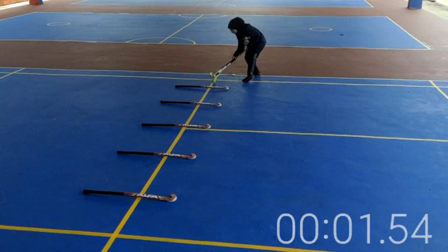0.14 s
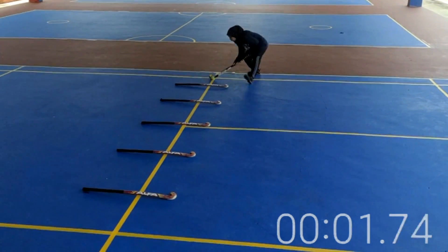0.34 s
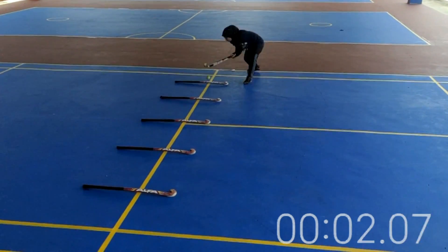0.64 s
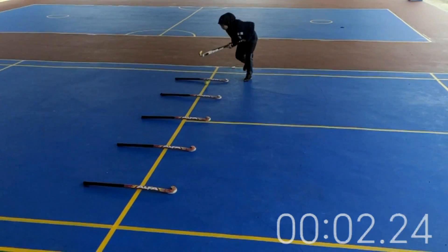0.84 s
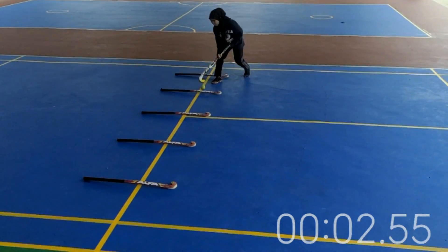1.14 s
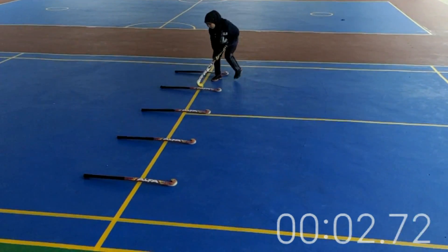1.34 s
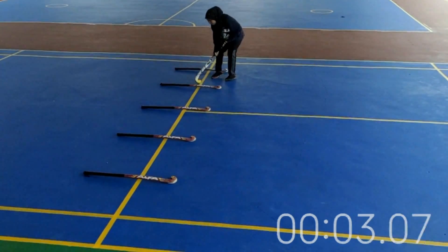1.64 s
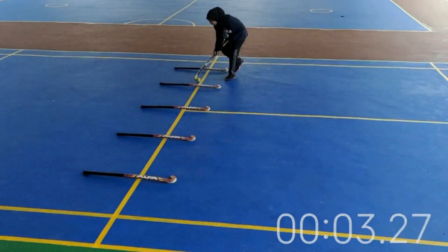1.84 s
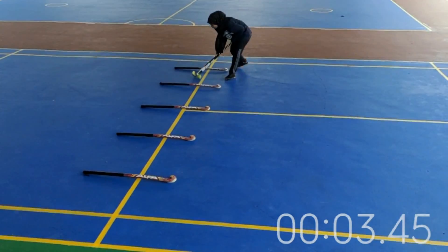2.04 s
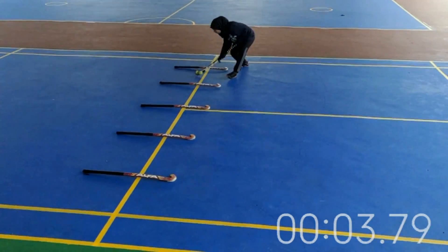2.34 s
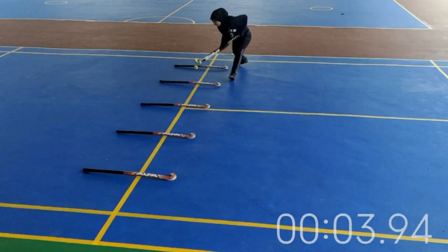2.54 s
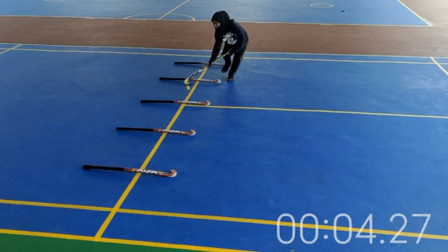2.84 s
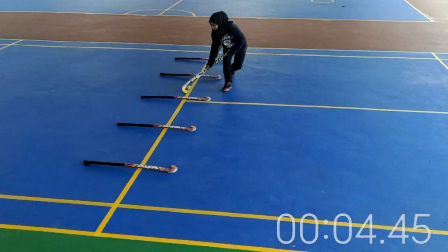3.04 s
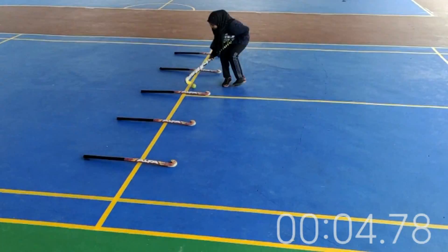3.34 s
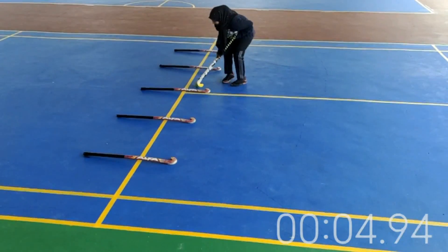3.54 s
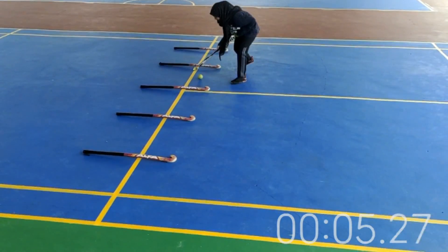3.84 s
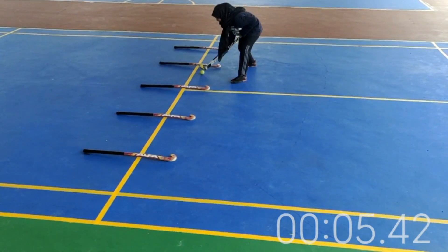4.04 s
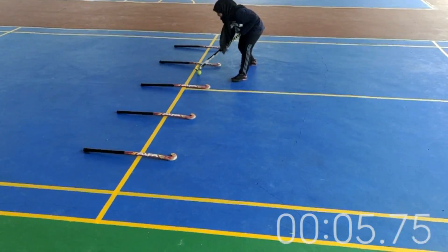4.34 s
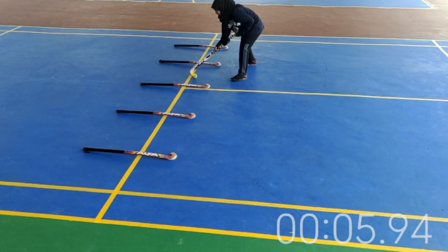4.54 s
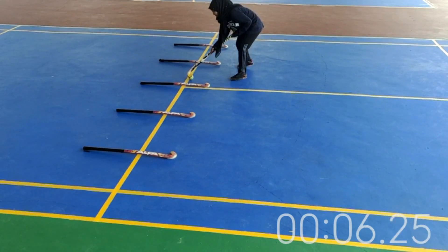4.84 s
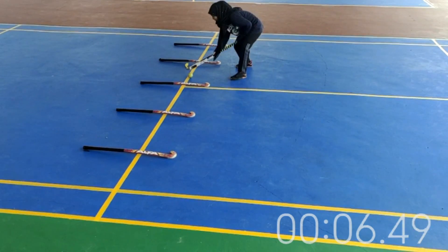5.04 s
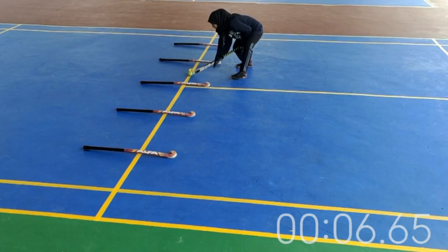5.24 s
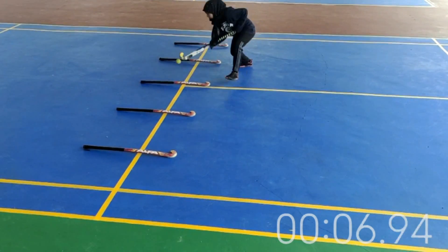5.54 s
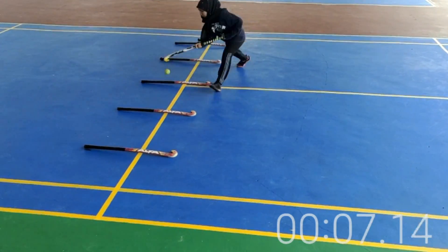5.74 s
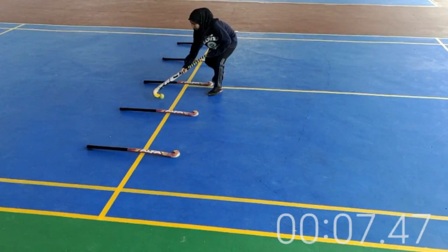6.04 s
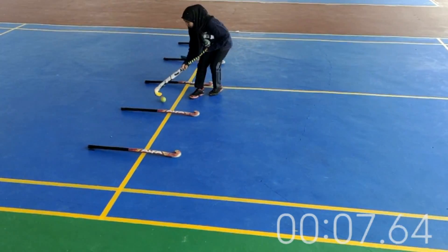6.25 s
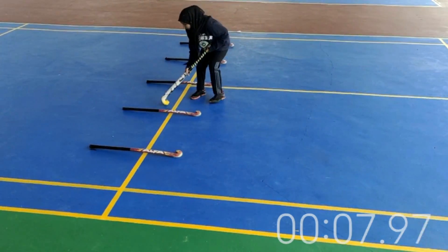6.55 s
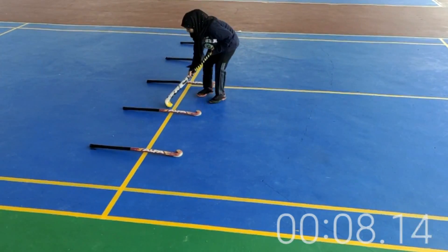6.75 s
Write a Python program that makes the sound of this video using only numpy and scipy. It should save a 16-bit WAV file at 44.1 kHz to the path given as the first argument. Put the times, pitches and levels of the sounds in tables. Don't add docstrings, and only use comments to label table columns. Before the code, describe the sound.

A hockey stick knocks a hard ball in uneven woody cracks along a roofed sports court, with ball thuds, faint sole squeaks and long echoes.

```python
import sys
import numpy as np
from scipy import signal
from scipy.fft import rfft, irfft
from scipy.io import wavfile
from scipy.ndimage import uniform_filter1d

SR = 44100
rng = np.random.default_rng(int(sys.argv[2]) if len(sys.argv) > 2 else 0)


def to_linear_factor(level_db):
    exponent = np.asarray(level_db, float) / 20
    return 10 ** exponent


def transcribe(u):
    v = np.clip(np.atleast_2d(u).T, -1, 1)
    q = np.round(v * 32767).astype(np.int16)
    wavfile.write(sys.argv[1], SR, q)


N = 303849
LEAD = SR // 2

ECHO_S = [.003, .0222, .0245, .0345, .08, .125]


def evened(x):
    return x / np.sqrt(np.mean(x ** 2) + 1e-20)


def read(points, hz):
    f, value = np.transpose(points)
    return np.interp(np.log(hz + 1), np.log(f + 1), value)


def add(mix, start_s, sound):
    part = mix[:, LEAD + round(start_s * SR):][:, :sound.shape[1]]
    part += sound[:, :part.shape[1]]


def coloured(x, points):
    size = x.shape[-1]
    return irfft(rfft(x) * to_linear_factor(read(points, np.fft.rfftfreq(size, 1 / SR))), size)


def paired(z, hz):
    # hz, likeness (0-1)
    likeness = [(60, 0.96), (300, 0.81), (640, 0.66), (1400, .02), (5000, 0.0071)]
    same = np.clip(read(likeness, hz), -1, 1)[:, None]
    right = same * z[0] + np.sqrt(1 - same ** 2) * z[1]
    return np.array([z[0], right])


def swing(t, hz):
    late = np.maximum(t - np.array([[0], [.0001]]), 0)
    envelope = np.exp(-(late * hz / 0.79) ** 2) * (1 - np.exp(-late * hz / 0.14))
    return -np.sin(2 * np.pi * hz * late) * envelope


def crack(t, decay_s, hz):
    # hz, level_db
    splinter = [(2000, -31), (3600, -8.5), (5500, -13.5), (7200, -7.5), (8600, -14), (10000, -28),
                (13000, -26), (16000, -51)]
    tilted = [(f, db - 4.3 * abs(np.log2(f / hz))) for f, db in splinter]
    noise = evened(coloured(rng.standard_normal((2, len(t))), tilted))
    return noise * np.exp(-t / decay_s) * (1 - np.exp(-t / 0.000046))


def shaft(t, hz, clean_db, chance):
    shaft_hz = [980, 1460, 1925, 2470, 3060, 3590, 4180, 4850]
    middle_db, uneven_db, t60_s = -9.5, 7.5, 0.066
    line_hz = np.array(shaft_hz)[:, None]
    line_db = -5.5 * np.log2(line_hz / hz) ** 2 + uneven_db * (chance[:len(line_hz)] - .5)
    decay = to_linear_factor(line_db - 60 * t / t60_s)
    ring = np.array([(decay * np.sin(2 * np.pi * line_hz * np.maximum(t - lag_s, 0))).sum(0)
                     for lag_s in (0, .0001)])
    ring = ring * (1 - np.exp(-t / 0.00012))
    return -to_linear_factor(middle_db + clean_db) * ring / abs(ring).max()


def knock(db, centre, crack_db, loose_db, clean_db):
    # pitch_hz, level_db
    modes = [(620, -14.5), (880, 7), (1100, -48.5), (1270, -8.5), (1395, 8.5), (1600, 4.5), (1780, 8.5),
             (1950, 1), (2150, -0.5), (2480, 7.5), (2750, -8.5), (3100, 12.5), (3650, 10.5), (4300, -9)]
    t, hz = np.arange(2048) / SR, 1526 * centre
    t60_s = 0.02722 * to_linear_factor(0.604 * loose_db)
    spread_oct = 0.83 - .015 * loose_db
    push_db = 0.25 * loose_db + 3.0
    mode_hz, mode_db = np.transpose(modes)[:, :, None]
    chance = rng.random((len(modes), 4))
    mode_hz = mode_hz * (1 + 0.0073 * (chance[:, :1] - .5))
    near_db = mode_db - 10 * (np.log2(mode_hz / hz) / spread_oct) ** 2 + 4 * (chance[:, 1:2] - .5)
    start = np.maximum(t - .0005 - .08 * t60_s * chance[:, 2:3], 0)
    decay = to_linear_factor(near_db - 60 * start / (t60_s + 0.00045)) * (1 - np.exp(-start / 0.00068))
    ring = np.array([(decay * np.sin(2 * np.pi * mode_hz * (start - lag_s))).sum(0)
                     for lag_s in (0, .00012)])
    bending = to_linear_factor(-max(clean_db, 0)) * ring / abs(ring).max()
    blade = to_linear_factor(crack_db) * crack(t, 0.0025, 5140) * (1 - np.exp(-t / 0.00035))
    push = 1.505 * to_linear_factor(push_db) * swing(t, 1.215 * hz)
    return to_linear_factor(db) * (push + 1.085 * bending + 1.64 * blade + shaft(t, hz, clean_db, chance[:, 3:]))


def all_round(sound, colour_db, send_db, crack_db):
    upward_hz = [700, 1700, 3400, 6800, 11000]
    power = uniform_filter1d((abs(rfft(sound, 8192)) ** 2).mean(0), size=22)
    bass_db = -0.69 * send_db
    treble_db = .25 * (-13.5 - crack_db)
    up_db = np.add(colour_db, [bass_db, 0, 0, treble_db, treble_db])
    tilt_db = send_db + read(np.c_[upward_hz, up_db], np.fft.rfftfreq(8192, 1 / SR))
    fold = irfft(np.log(power * to_linear_factor(2 * tilt_db) + 1e-12) / 2)
    fold[1:4096] *= 2
    fold[4097:] = 0
    return irfft(np.exp(rfft(fold)))[None, :2048]


def court():
    # pitch_hz, width_hz, lift_db
    tail_lines = [(985, 45, 7), (1470, 50, 5.5), (1920, 55, 5.5), (2490, 65, 3), (3060, 55, 8), (3580, 80, 7),
                  (4170, 90, 6), (4850, 70, 4)]
    # hz, t60_s
    tail_t60 = [(250, 2.17), (700, 2.14), (1700, 1.52), (4500, 1.58), (8000, 1.023), (13000, 0.47)]
    # level_db, spread_t60_s
    echoes = [(-9, 0.038), (-10.5, 0.0061), (-8, 0.031), (-8, 0.054), (-28, .03), (-22.5, .03)]
    tail_db, tail_rise_s, tail_line_share = -14.5, 0.043, 0.33
    size = 2 * SR
    t = np.arange(size) / SR
    hz, frame_s, z = signal.stft(rng.standard_normal((2, size)), SR, nperseg=256)
    z = paired(z, hz) * to_linear_factor(-60 * frame_s / read(tail_t60, hz)[:, None])
    tail = signal.istft(z, SR, nperseg=256)[1][:, :size]
    for tail_line_hz, width_hz, lift_db in tail_lines:
        line = signal.lfilter(*signal.iirpeak(tail_line_hz, tail_line_hz / width_hz, SR), tail)
        tail = tail + (to_linear_factor(tail_line_share * lift_db) - 1) * line
    since = np.maximum(t - ECHO_S[1], 0)
    power = to_linear_factor(2 * tail_db) * (1 - np.exp(-since / tail_rise_s))
    for delay_s, (db, spread_s) in zip(ECHO_S, echoes):
        power = power + (t > delay_s) * to_linear_factor(2 * (db - 60 * np.maximum(t - delay_s, 0) / spread_s))
    return .12 * tail * np.sqrt(power)


def hum():
    # hz, level_db (per Hz)
    spectrum = [(25, -27), (60, -33.5), (100, 7), (200, 2.5), (400, -5), (700, -7), (1100, -8.5),
                (1600, -11), (2400, -6.5), (2700, -29), (5000, -24.5), (9000, -25.5), (15000, -57)]
    hum_db, mains_hz, mains_db = -64.5, 104.3, -75
    frames, hz = N // 256 + 5, np.fft.rfftfreq(1024, 1 / SR)
    a, b, c, d, patches = rng.standard_normal((frames, 513, 5)).T
    patches = evened(uniform_filter1d(uniform_filter1d(patches, 8, 0), 20, 1))
    drift_db = 2.0 * patches * np.clip(hz / 1200, .3, 1)[:, None]
    z = paired([a + 1j * b, c + 1j * d], hz) * to_linear_factor(read(spectrum, hz)[:, None] + drift_db)
    air = evened(signal.istft(z, nperseg=1024, noverlap=768)[1][:, :N])
    waver = evened(uniform_filter1d(rng.standard_normal(N), 4000))
    mains = to_linear_factor(mains_db + 2.0 * waver) * np.sin(2 * np.pi * mains_hz * np.arange(N) / SR)
    return to_linear_factor(hum_db) * air + mains


def bounce(db, hz, tick_db):
    t, tick_hz = np.arange(2048) / SR, 6400
    hollow = 0.12 * np.sin(2 * np.pi * 2.0 * hz * t) * to_linear_factor(-60 * t / 0.012)
    tick = crack(t, 0.00084, tick_hz) + 0.04 * crack(t, 0.00064, tick_hz)
    return to_linear_factor(db) * (0.9 * (swing(t, hz) + hollow) + 1.18 * to_linear_factor(tick_db) * tick)


def scuff(length_s, db, hz):
    size = round(length_s * SR)
    width_hz = hz * (.035 if hz < 4000 else 0.5)
    offset_hz = np.fft.rfftfreq(size, 1 / SR) - hz
    rasp = irfft(rfft(rng.standard_normal((2, size))) * np.exp(-(offset_hz / width_hz) ** 2), size)
    return to_linear_factor(db) * evened(rasp) * np.hanning(size)


def scene():
    # start_s, blow_db, ring_centre (factor), crack_db (relative), loose_grip_db
    earlier = [
        (-0.23, -22.5, 0.96, -11.5, -1.77),
    ]
    edge = [
        (0.277, -26.5, 1.125, -10.5, 1.5),
        (1.954, -52.5, 0.56, -8.5, -0.5),
        (2.146, -40, 0.84, -21, -1),
        (2.82, -30, 0.92, -8.5, 1.5),
        (2.918, -16.5, 1.3, -18, -2.5),
        (5.85, -25.5, 0.92, -8, -2.5),
        (6.816, -55, 1.7, -18, -7),
    ]
    flush = [
        (1.143, -25.5, 0.94, -10.5, -1.5),
        (1.715, -34, 0.95, -9, -3.5),
        (1.985, -37, 0.75, -32.5, -2),
        (3.523, -28, 0.88, -30.5, -3.5),
        (4.034, -26.5, 1.21, -24, -3.5),
        (4.598, -47, 0.77, -26.5, -4),
        (5.158, -27, 1.186, -12.5, 5.5),
        (6.671, -32.5, 0.77, -17, -2.5),
    ]
    # start_s, peak_db, thud_hz, tick_db (relative), roof_send_db
    bounces = [(0.224, -34, 830, -11.5, -5), (0.692, -32.5, 760, -10.5, 2), (0.829, -36.5, 840, -9, -4),
               (1.043, -42, 557, -40, 5), (1.087, -43, 986, -40, 12), (2.742, -24, 890, -10, 2),
               (2.9, -34, 1300, -1.5, -3), (4.101, -19, 1065, -2.5, -6.5), (5.655, -38.5, 474, -19, 0),
               (5.813, -19.5, 1039, -10.5, -2.5), (5.94, -29.5, 637, -19, -10)]
    # start_s, length_s, level_db, centre_hz, roof_send_db
    scuffs = [(2.471, 0.05, -58, 8670, -5.5), (2.481, 0.13, -71, 2835, -4.5),
              (3.326, 0.0077, -52, 7900, 5.5), (4.794, 0.039, -71.5, 7630, -0.5),
              (4.836, 0.07, -72.5, 7250, 0.5), (4.741, 0.079, -67, 2015, -1),
              (4.816, 0.069, -65, 2354, 4.3), (4.889, 0.072, -66, 2120, -5), (5.035, 0.1, -66.5, 1710, -9),
              (5.768, 0.23, -64.5, 9400, 9), (6.452, 0.033, -68, 8600, -7)]
    stick_up = [0, 1, 2.5, 4.5, 11.5]
    ball_up = [-2, -1, 1.3, -5, 7.5]
    # delay_s, level_db
    mirrors = [(0.025, -10), (0.0376, -9.5)]
    edge_clean_db, flush_clean_db = -13.5, 6.5
    knock_lag_s, bounce_lag_s = .0007, .0017
    mirror_hz, near_held = 1910, .95
    approach, midway_s = .0009, 3.6

    sounds = []
    blows = [(*row, edge_clean_db) for row in earlier + edge] + [(*row, flush_clean_db) for row in flush]
    for s, db, centre, crack_db, loose_db, clean_db in sorted(blows):
        sound = knock(db, centre, crack_db, loose_db, clean_db)
        sent = all_round(sound, stick_up, loose_db, crack_db)
        sounds.append((s + knock_lag_s, sound, sent, loose_db))
    for s, db, hz, tick_db, send_db in bounces:
        sound = bounce(db, hz, tick_db)
        sounds.append((s + bounce_lag_s, sound, all_round(sound, ball_up, send_db, tick_db), 0))
    for s, *row, send_db in scuffs:
        sound = scuff(*row)
        sounds.append((s, sound, to_linear_factor(send_db) * sound[1:], 0))

    direct, wet = np.zeros((2, LEAD + N)), np.zeros((2, LEAD + N))
    places = [court() for _ in range(4)]
    mirror = signal.butter(2, mirror_hz, fs=SR, output="sos")
    near = np.arange(2 * SR) < ECHO_S[1] * SR
    for k, (s, sound, sent, loose_db) in enumerate(sounds):
        add(direct, s, sound)
        later_s, place = s + approach * (s - midway_s), places[k % len(places)]
        for delay_s, db in mirrors:
            add(wet, later_s + delay_s, to_linear_factor(db) * signal.sosfilt(mirror, sound))
        add(wet, s, to_linear_factor(-near_held * loose_db) * signal.fftconvolve(sent, place[:, near], axes=1))
        add(wet, later_s, signal.fftconvolve(sent, place * ~near, axes=1))

    direct = signal.sosfilt(signal.butter(2, 10700, fs=SR, output="sos"), direct)
    radiated = signal.sosfilt(signal.butter(2, 380, "high", fs=SR, output="sos"), direct + wet)
    return radiated[:, LEAD:] + hum()


def roll_off(x):
    return signal.sosfilt(signal.butter(12, 16180, fs=SR, output="sos"), x)


def record(dry):
    # hz, level_db (per bin)
    gate = [(300, -110), (600, -84), (1100, -81), (2400, -99.5), (3000, -84), (8000, -97), (16000, -104)]
    # hz, difference_db
    ports = [(400, 0.2), (750, 0.4), (1300, -6), (2400, 0.5), (4400, 2.5), (7500, 3), (12000, 0)]
    hz, _, z = signal.stft(dry, SR, nperseg=1024, noverlap=768)
    power = uniform_filter1d((abs(z) ** 2).mean(0), size=5, axis=1, origin=2)
    power = uniform_filter1d(power, size=3, axis=0)
    floor_power = to_linear_factor(2 * read(gate, hz))[:, None]
    kept = 0.2 + 0.96 * power / (power + floor_power ** 2 / (power + 1e-20))
    apart = to_linear_factor(np.outer([.5, -.5], read(ports, hz)))[:, :, None]
    mix = signal.istft(z * kept * apart, SR, nperseg=1024, noverlap=768)[1][:, :N]
    return roll_off(mix)


dry = scene()
out = record(dry)
transcribe(out)
```